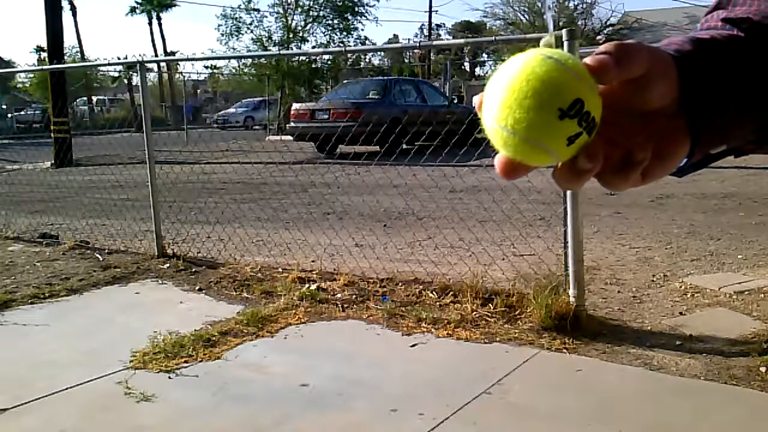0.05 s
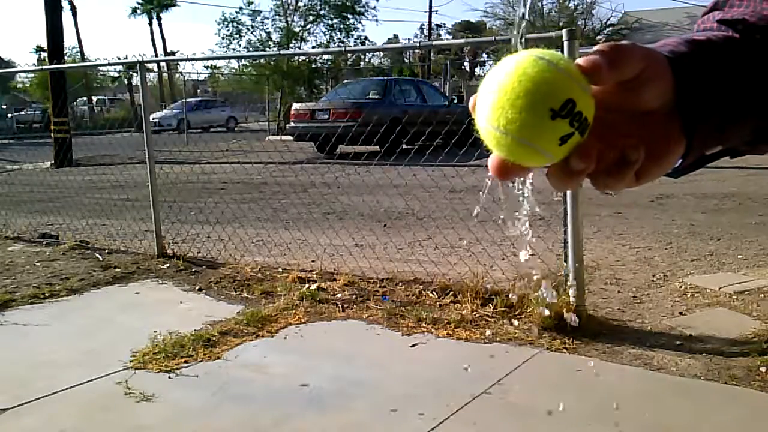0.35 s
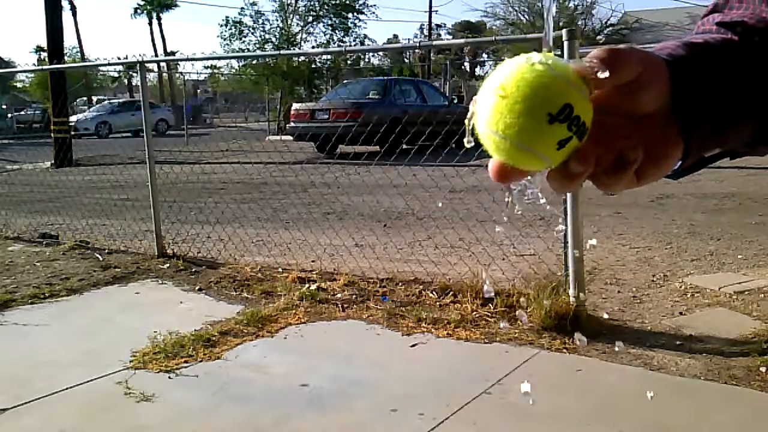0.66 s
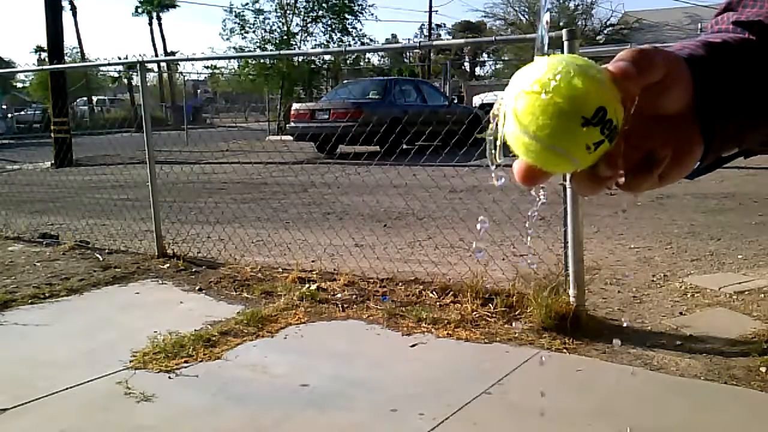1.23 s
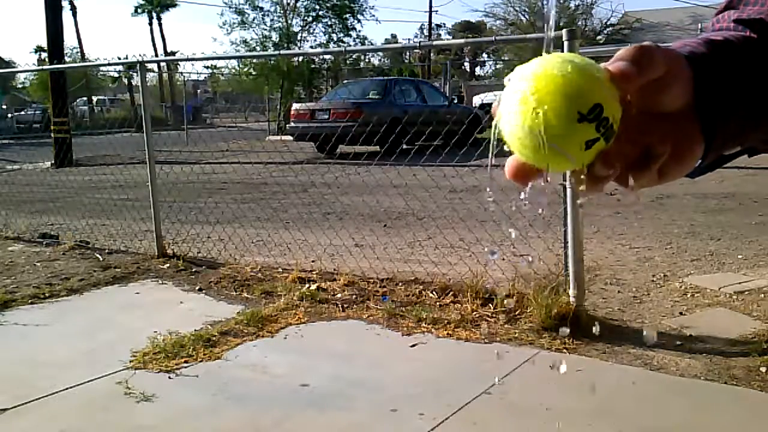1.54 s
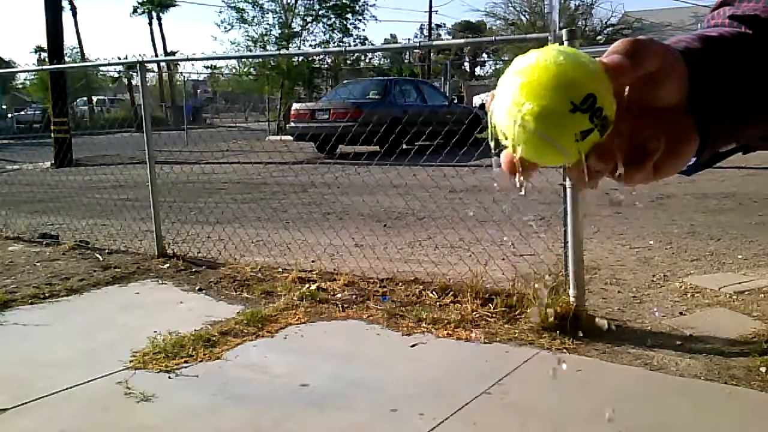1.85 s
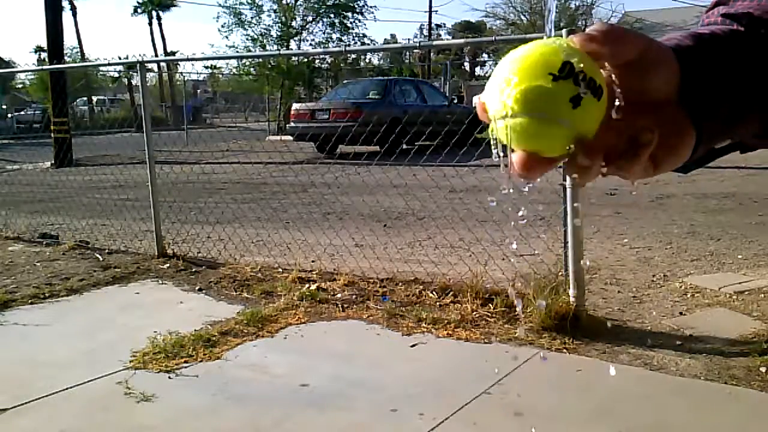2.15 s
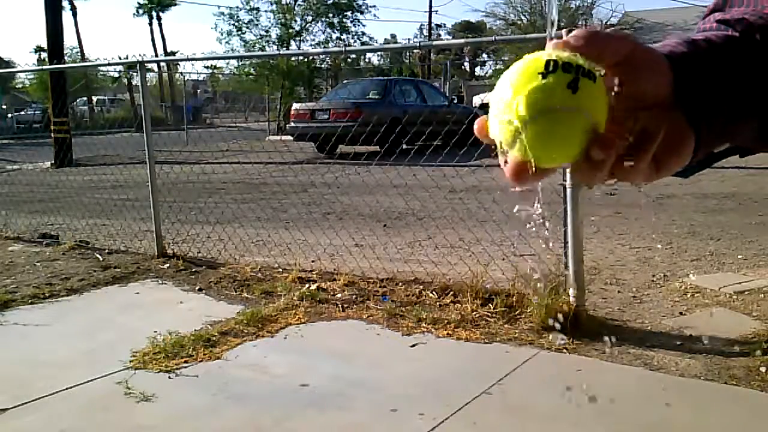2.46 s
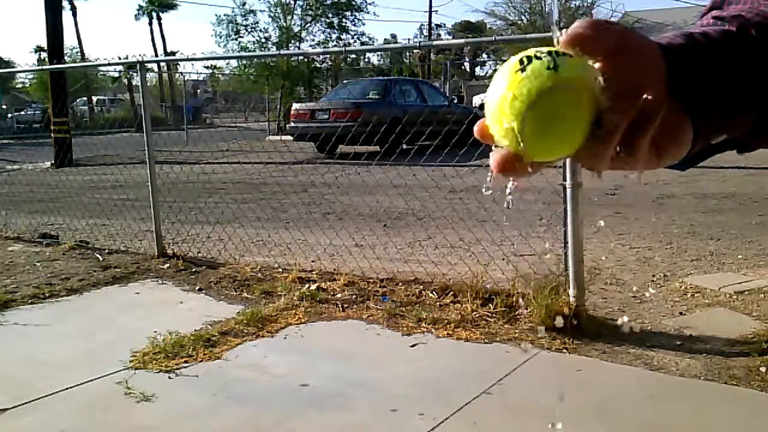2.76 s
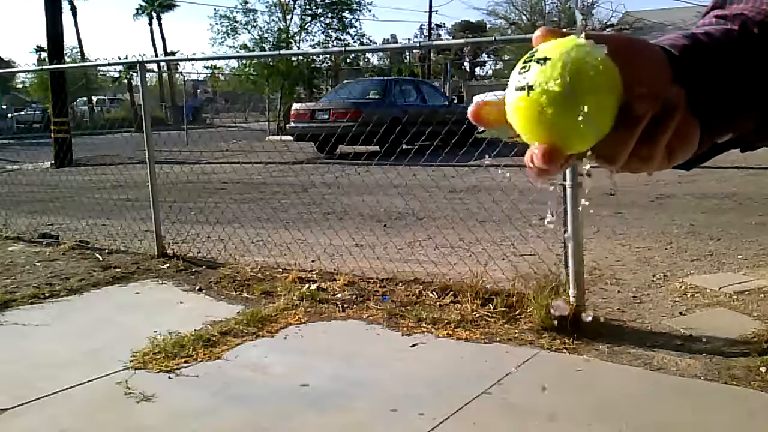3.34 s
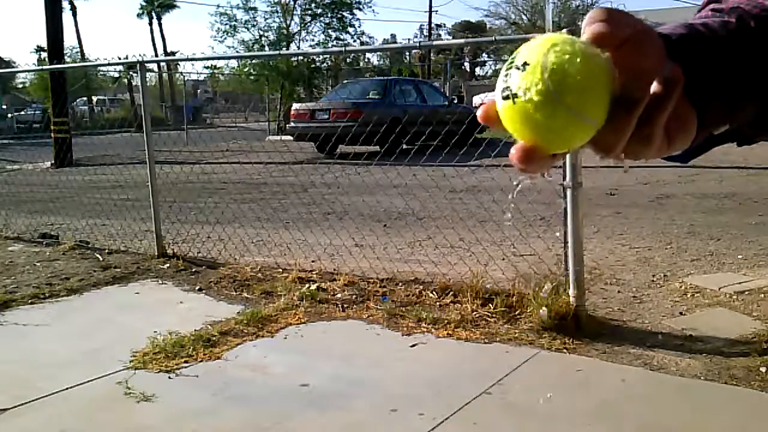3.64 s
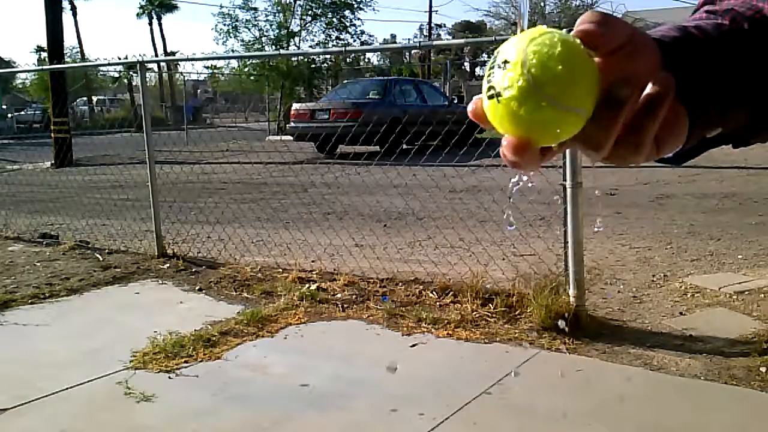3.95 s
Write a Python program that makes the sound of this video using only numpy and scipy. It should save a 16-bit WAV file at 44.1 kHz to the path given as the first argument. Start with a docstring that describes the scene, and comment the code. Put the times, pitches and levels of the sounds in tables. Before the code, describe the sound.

Water trickles and drips onto concrete outdoors, with wind buffeting the microphone.

```python
"""A thin stream of water runs over a hand-held tennis ball and drips onto concrete, outdoors.
Each drop snaps, rings for about a millisecond, slaps again as it collapses and scatters spray,
over the fizz of the trickle. Wind buffets the microphone with rumble, gusts and single thumps.
Behind it a car's tyre roar recedes along the street over distant traffic and a faint hum,
and something chirps far off."""
import sys
import numpy as np
from scipy import signal
from scipy.fft import rfft, irfft
from scipy.io import wavfile
from scipy.ndimage import uniform_filter1d, minimum_filter1d

SR = 44100
rng = np.random.default_rng(int(sys.argv[2]) if len(sys.argv) > 2 else 0)


def log_audio(samples):
    """Write samples as a 16-bit WAV file to the path given in sys.argv[1]."""
    # one column per channel
    frames = np.atleast_2d(samples).T
    # limit to full scale, then quantise
    limited = np.clip(frames, -1, 1)
    pcm = np.round(limited * 32767).astype(np.int16)
    wavfile.write(sys.argv[1], SR, pcm)


N = 176400
T = np.arange(N) / SR

# fader ride of the whole trickle: time_s, level_db
TRICKLE_RIDE = [(0, -41), (.3, -41), (.345, -35.5), (.41, -39.5), (.47, -38.5), (.57, -41.5), (.62, -44.5),
                (.7, -41.5), (.8, -43), (1.05, -42.5), (1.21, -44.5), (1.5, -48.5), (1.7, -52), (1.86, -49),
                (2, -44.5), (2.25, -49.5), (2.5, -46), (2.72, -52.5), (2.87, -57), (2.93, -50), (2.98, -51),
                (3.1, -44), (3.28, -51.5), (3.5, -49), (3.72, -51.5), (4, -48)]
# tone of the trickle's fizz: freq_hz, relative_db
FIZZ_EQ = [(1000, -22), (2500, -17), (3300, -4), (4000, -2), (5300, 1.5), (7000, 0.5), (9500, 1.5),
           (12000, -3.5), (16000, -9.5)]
# tone of the tiny droplets: freq_hz, relative_db
TICK_EQ = [(1500, -42), (3000, -12), (5000, -2), (8000, -1), (12000, -5.5), (16000, -10)]
# fader ride of the wind's deep rumble: time_s, level_db
RUMBLE_RIDE = [(0.0, -36.5), (0.47, -28), (0.49, -17), (1.12, -20), (1.44, -16.5), (2.03, -19.5),
               (2.05, -45), (2.1, -14.5), (2.48, -20.5), (2.9, -16), (2.94, -34), (2.96, -25), (3.02, -13),
               (3.12, -21), (3.16, -14.5), (3.27, -21), (3.35, -12.5), (3.41, -24.5), (3.93, -14),
               (4.0, -39)]
# tone of that rumble: freq_hz, relative_db
RUMBLE_EQ = [(8, -22.5), (20, -6.5), (32, 0.5), (55, -2), (80, -4), (105, -8.5), (150, -33), (400, -67.5)]
# force of the gusts at the microphone: time_s, strength_db
GUST_STRENGTH = [(0.0, -61), (0.19, -51), (0.21, -20.5), (0.28, -47), (0.31, -23.5), (0.37, -35.5),
                 (0.42, -20), (0.46, -25.5), (0.51, -16), (0.53, -24), (0.62, -17.5), (0.78, -31),
                 (0.8, -20.5), (0.85, -23.5), (0.88, -20), (0.9, -20.5), (0.98, -21), (1.02, -37),
                 (1.09, -16.5), (1.16, -28), (1.18, -22), (1.24, -27), (1.27, -20.5), (1.73, -15),
                 (1.74, -19.5), (1.82, -14), (1.95, -18), (1.96, -27.5), (2.08, -25), (2.14, -16),
                 (2.35, -26.5), (2.39, -17), (2.42, -21.5), (2.44, -17.5), (2.51, -27.5), (2.52, -22.5),
                 (2.56, -17), (2.6, -21), (2.64, -25.5), (2.71, -20.5), (2.74, -24), (2.86, -15),
                 (2.88, -18), (2.92, -16), (3.07, -20.5), (3.11, -28), (3.13, -16.5), (3.15, -21.5),
                 (3.27, -19.5), (3.31, -28), (3.38, -24.5), (3.41, -33), (3.53, -41), (3.56, -17),
                 (3.68, -29), (3.7, -30.5), (3.78, -15.5), (3.9, -29), (3.92, -19.5), (4.0, -25.5)]
# wind bands in a gust of GUST_REF_DB: centre_hz, level_db, growth_db_per_gust_db
GUST_BANDS = [(111.5, -22, 1), (159.3, -25, 1.5), (217.4, -28, 2.27), (305.3, -39.5, 2.57), (423, -48, 3),
              (654, -60.5, 3)]
# single hard thumps of wind: centre_s, peak_db, half_width_ms
THUMPS = [(0.634, -9.5, 1.15), (1.085, -9, 1.9), (1.614, -1, 0.89), (1.774, -4.5, 0.86), (1.813, 2.5, 2.9),
          (1.850, -8, 0.83), (2.040, -11.5, 1.37), (2.145, -7, 0.91), (2.228, -8, 3.1), (2.396, -9, 1.37),
          (2.561, -3.5, 1.22), (2.8628, -7, 0.74), (2.916, -3, 0.98), (2.93, 0.5, 2.56),
          (2.989, -7.5, 0.92), (3.215, -7.5, 1.03)]
# fader ride of the distant traffic: time_s, level_db
TRAFFIC_RIDE = [(0.0, -48), (0.37, -45.5), (0.54, -48), (0.82, -49), (1.32, -51.5), (1.73, -56),
                (1.9, -51.5), (2.03, -52.5), (2.48, -52.5), (2.86, -56), (3.38, -53.5), (4.0, -52.5)]
# tone of that traffic: freq_hz, relative_db
TRAFFIC_EQ = [(40, 3.5), (150, 13.5), (300, 6.5), (500, 6.5), (750, 2), (1000, -0.5), (1300, -4.5),
              (1600, -3.5), (2000, -8), (3000, -7), (4000, -18), (6000, -29), (16000, -27)]
# fader ride of the car's tyre roar: time_s, level_db
TYRE_RIDE = [(0, -50), (.2, -44), (.33, -50), (.45, -39), (.6, -58), (.8, -50.5), (1.1, -51), (1.25, -46.5),
             (1.36, -48), (1.47, -43.5), (1.68, -46), (1.85, -59), (2.6, -61), (3.05, -59), (3.25, -50),
             (3.5, -51.5), (3.8, -57), (4, -47)]
# tone of the tyre roar: freq_hz, relative_db
TYRE_EQ = [(300, -38), (600, -10.5), (780, -1.5), (950, -3), (1150, -18.5), (1500, -25.5), (3000, -40),
           (8000, -43)]
# tones of the distant hum: pitch_hz, level_db
HUM_TONES = [(603, -56), (1001, -64), (1890, -68)]
# far-off chirps: start_s, length_s, from_hz, to_hz, level_db
CHIRP_CUES = [(0.664, 0.062, 4010, 3470, -34.5), (0.928, 0.11, 3600, 3150, -39.5),
              (1.371, 0.091, 3300, 3520, -37.5), (3.093, 0.058, 4300, 3230, -40)]
# drops on concrete, snap and spray relative to the ring:
# start_s, level_db, pitch_hz, decay_ms, snap_db, spray_db
DROP_CUES = [(.7276, -25, 5500, .4, -1, -20), (0.8432, -17.5, 6350, 0.7, -7, -27.5),
             (0.9506, -10, 5900, 0.75, -14, -33), (1.0158, -31, 12500, 0.34, -2, -13),
             (1.1423, -4, 5580, 0.92, -12, -30.5), (1.2289, -17, 11900, .2, -4.5, -28),
             (1.3075, -16.5, 5400, .8, -5, -23.5), (1.3331, -12, 5540, 1.14, -12, -25.5),
             (1.386, -19, 5430, 0.91, -6, -23.5), (1.7347, -25, 5860, 1.2, -1, -20),
             (1.7907, -23, 6200, 1.1, -7, -18.5), (1.8696, -14, 3190, 1.3, -6.5, -25.5),
             (1.9240, -22.5, 5100, 0.84, -0.5, -24), (2.0025, -28, 9800, 0.53, -4, -20),
             (2.0473, -24.5, 7100, 1, -9, -18), (2.0746, -17, 5200, 0.66, -7, -23.5),
             (2.1141, -24.5, 3250, 1.5, 4, -27), (2.2690, -28, 13000, 0.2, -5, -17),
             (2.4478, -12, 5860, 1.23, -11, -22.5), (2.487, -16.5, 4500, 1.03, -10, -22.5),
             (2.8934, -17, 3230, 1.14, -8.5, -21), (2.9457, -35.5, 11000, .5, 0, -10),
             (2.9761, -25, 11300, 0.35, 1, -22), (2.978, -26.5, 4480, 1, -6, -22),
             (3.0488, -21, 8700, .7, -6, -16.5), (3.0720, -27.5, 4670, 3.5, -5, -13),
             (3.1075, -22.5, 8400, 0.41, -8, -23), (3.1568, -18.5, 9900, 0.44, -1.5, -27),
             (3.2021, -24, 5600, 1, -12, -28), (3.3314, -15.5, 6700, 0.99, -6, -23.5),
             (3.3602, -32, 7040, .7, -13, -10), (3.4984, -17.5, 12300, 0.28, -9, -21),
             (3.5250, -15.5, 3180, 1.6, -6, -26.5), (3.6723, -22, 6220, .9, -3, -27),
             (3.7697, -33, 12000, .4, -4, -14), (3.8304, -21, 3300, 1.33, 0, -20),
             (3.856, -32, 8800, 0.53, 3, -10), (3.893, -23, 7800, 0.73, -9, -27),
             (3.9046, -29, 9400, .7, -9, -18)]
# partials of a drop's ring: pitch_ratio, relative_db
RING_MODES = [(0.98, 3.5), (0.848, -4), (1.094, 4), (1.58, 3)]

FIZZ_TRIM_DB, FIZZ_FLICKER_DB = 1.5, 2
TICKS_PER_S, TICKS_START_S, TICK_DECAY_S, TICK_SPREAD_DB, TICK_TRIM_DB = 160, .7, .0018, 9.5, -3
GUST_REF_DB, RUMBLE_TRIM_DB, TRAFFIC_TRIM_DB = -20, -.5, 11
HUM_WAVER, CHIRP_SMEAR_HZ = .0065, 340
DROP_TRIM_DB, SNAP_DECAY_S, RING_ATTACK_CYCLES, RING_SAG = 4, .00047, 1.72, .04
RING_KNEE_HZ, RING_ROLLOFF_DB_PER_OCT = 4970, 46
REBOUND_S, REBOUND_DB = .0009, -4  # the second slap as the drop collapses
SPRAY_TRIM_DB, SPRAY_DECAY_S, SPRAY_GRAIN_DB = .5, .015, 4
SETTLE_DB, SETTLE_DECAY_S = -12, .11  # the last specks of spray to land
LIMIT_DB, LIMIT_HOLD_S, HIGH_CUT_HZ = -2.5, .012, 15900


def undb(db):
    """Decibels to gain."""
    return 10 ** (np.asarray(db) / 20)


def unit(x):
    """Scale to rms 1."""
    return x / np.sqrt(np.mean(x ** 2) + 1e-18)


def ride(rows):
    """Automation lane: straight lines through rows of time_s, value."""
    times, values = np.array(rows).T
    return np.interp(T, times, values)


def eq(x, points):
    """Minimum-phase EQ through rows of freq_hz, relative_db; the result has rms 1."""
    hz, db = np.array(points).T
    freqs = np.maximum(np.arange(N // 2 + 1) * SR / N, 1)
    gains = undb(np.interp(np.log(freqs), np.log(hz), db))
    cepstrum = irfft(np.log(gains), N)
    causal_fold = np.r_[1, np.full(N // 2 - 1, 2), np.zeros(N - N // 2)]
    return unit(irfft(rfft(x) * np.exp(rfft(cepstrum * causal_fold)), N))


def band(x, lo, hi, order):
    """Band-pass between lo and hi, in Hz."""
    top = min(hi, SR * .47)
    bottom = min(lo, top / 2 ** (1 / 10))
    return signal.sosfilt(signal.butter(order, [bottom, top], "band", fs=SR, output="sos"), x)


def wobble(rate_hz):
    """Smooth random modulation with rms 1."""
    step = max(int(SR / rate_hz), 1)
    held = np.repeat(rng.standard_normal(N // step + 1), step)
    return unit(uniform_filter1d(held, step)[:N])


def even_out(x, window_s):
    """Flatten the chance swells of a noise by dividing by its running rms."""
    return x / np.sqrt(uniform_filter1d(x ** 2, int(window_s * SR)) + 1e-6)


def add(out, start, x):
    """Mix a sound in at start seconds."""
    i = max(int(start * SR), 0)
    out[i:i + len(x)] += x[:max(N - i, 0)]


def trickle():
    """Fine flickering fizz, with tiny droplets ticking at random once the water reaches the ground."""
    fizz = eq(rng.standard_normal(N), FIZZ_EQ) * undb(FIZZ_TRIM_DB + FIZZ_FLICKER_DB * wobble(25.15))
    sizes = undb(TICK_SPREAD_DB * np.minimum(rng.standard_normal(N), 1))
    hits = (rng.random(N) < TICKS_PER_S / SR) * sizes * (T > TICKS_START_S)
    tails = signal.lfilter([1], [1, -np.exp(-1 / (SR * TICK_DECAY_S))], hits)
    ticks = eq(tails * rng.standard_normal(N), TICK_EQ)
    return undb(ride(TRICKLE_RIDE)) * (fizz + undb(TICK_TRIM_DB) * ticks)


def wind():
    """Turbulence on the microphone: a deep rumble, and gusts that brighten as they blow harder."""
    rumble = even_out(eq(rng.standard_normal(N), RUMBLE_EQ), window_s=.067)
    out = rumble * undb(ride(RUMBLE_RIDE) + RUMBLE_TRIM_DB)
    gust_db = ride(GUST_STRENGTH) - GUST_REF_DB
    for hz, db, growth in GUST_BANDS:
        eddies = band(rng.standard_normal(N), hz / 1.215, hz * 1.2025, order=3)
        out += even_out(eddies, window_s=.06) * undb(db + growth * gust_db)
    return out


def traffic():
    """Distant traffic: a dark bed of noise with a slight flutter."""
    bed = eq(rng.standard_normal(N), TRAFFIC_EQ)
    return bed * undb(ride(TRAFFIC_RIDE) + TRAFFIC_TRIM_DB + .25 * wobble(28))


def car():
    """Tyres on the street: a midrange roar that swells and ebbs."""
    return eq(rng.standard_normal(N), TYRE_EQ) * undb(ride(TYRE_RIDE))


def hum():
    """Faint distant tones, each wavering in level and pitch."""
    out = np.zeros(N)
    for hz, db in HUM_TONES:
        gain = undb(db + 2.1 * wobble(6.36))
        pitch_hz = hz * (1 + HUM_WAVER * wobble(13))
        out += gain * np.sin(2 * np.pi * np.cumsum(pitch_hz) / SR)
    return out


def thumps():
    """Single eddies strike the microphone: a pressure spike with a dip on either side."""
    out = np.zeros(N)
    for centre_s, db, half_width_ms in THUMPS:
        offset = (T - centre_s) * 1000 / half_width_ms
        out += undb(db) * (1 - offset ** 2) * np.exp(-offset ** 2 / 2)
    return out


def chirps():
    """Faint glides smeared into narrow noise, perhaps a far bird."""
    out = np.zeros(N)
    for start, length, from_hz, to_hz, db in CHIRP_CUES:
        progress = np.linspace(0, 1, int(length * SR))
        pitch_hz = to_hz + (from_hz - to_hz) * (1 - progress) ** 2
        phase = 2 * np.pi * np.cumsum(pitch_hz) / SR
        smear = [wobble(2 * CHIRP_SMEAR_HZ)[:len(progress)] for _ in range(2)]
        glide = smear[0] * np.cos(phase) + smear[1] * np.sin(phase)
        add(out, start, undb(db) * np.sin(np.pi * progress) * glide)
    return out


def snap(t, hz):
    """Water hits concrete: a tiny, bright crack of noise."""
    crack = unit(band(rng.standard_normal(len(t)), hz / np.sqrt(2), 15200, order=4))
    return crack * np.exp(-t / SNAP_DECAY_S) * (1 - np.exp(-t * hz))


def ring(t, hz, decay_s):
    """A drop's very short ping, sagging in pitch; big, low drops keep their overtones."""
    ratios, db = np.array(RING_MODES).T
    octaves_over = np.maximum(np.log2(hz * ratios / max(hz, RING_KNEE_HZ)), 0)
    gains = undb(db - RING_ROLLOFF_DB_PER_OCT * octaves_over)
    gains /= np.linalg.norm(gains)
    modes_hz = hz * ratios * (1 + .027 * rng.standard_normal(len(ratios)))
    decay = np.exp(-t / decay_s)
    attack = 1 - np.exp(-t * hz / RING_ATTACK_CYCLES)
    bent_time = np.cumsum(1 + RING_SAG * (decay - .5)) / SR
    ping = gains @ np.sin(2 * np.pi * np.outer(modes_hz, bent_time))
    return ping * attack * decay


def spray(t, hz):
    """Scattered specks land: a grainy splash around the drop's pitch, with a soft settling tail."""
    roughness = unit(uniform_filter1d(rng.standard_normal(len(t)), size=40))
    grains = unit(undb(SPRAY_GRAIN_DB * roughness))
    splash = unit(band(rng.standard_normal(len(t)), hz * .77, hz * 1.65, order=3))
    envelope = np.exp(-t / SPRAY_DECAY_S) + undb(SETTLE_DB) * np.exp(-t / SETTLE_DECAY_S)
    return splash * grains * envelope


def drops():
    """Each drop snaps and rings on landing, slaps again as it collapses and throws spray."""
    out, t = np.zeros(N), T[:SR // 4]
    for start, db, hz, decay_ms, snap_db, spray_db in DROP_CUES:
        for lag_s, slap_db in ((0, 0), (REBOUND_S, REBOUND_DB)):
            slap = ring(t, hz, decay_ms / 1000) + undb(snap_db) * snap(t, hz)
            loose_lag_s = lag_s * (1 + .059 * rng.standard_normal())
            add(out, start + loose_lag_s, undb(db + slap_db) * slap)
        add(out, start, undb(db + spray_db + SPRAY_TRIM_DB) * spray(t, hz))
    return undb(DROP_TRIM_DB) * out


def scene():
    """Water, wind and street in one mono mix."""
    return (trickle() + wind() + traffic() + car() + hum() + thumps() + chirps() + drops())[None]


def record(dry):
    """A smooth limiter ducks the hardest peaks, then a steep high cut trims the top."""
    hold = int(LIMIT_HOLD_S * SR)
    gain = np.minimum(1, undb(LIMIT_DB) / (np.abs(dry) + 1e-9))
    gain = uniform_filter1d(minimum_filter1d(gain, 2 * hold), hold)
    high_cut = signal.ellip(10, .2, 80, HIGH_CUT_HZ, fs=SR, output="sos")
    return signal.sosfilt(high_cut, dry * gain)


dry = scene()
out = record(dry)
log_audio(out)
```